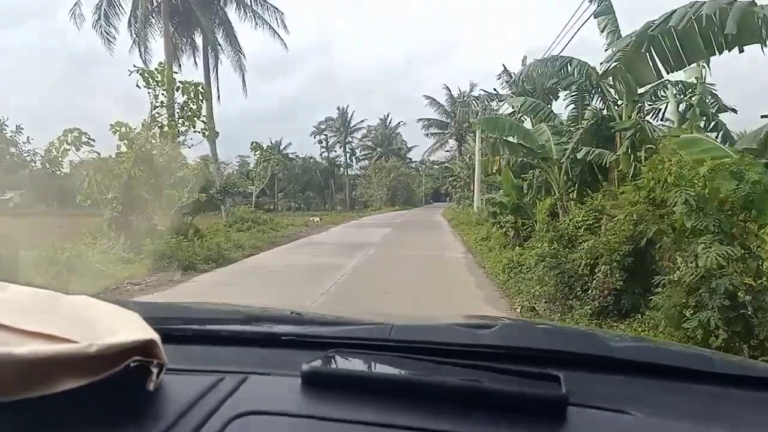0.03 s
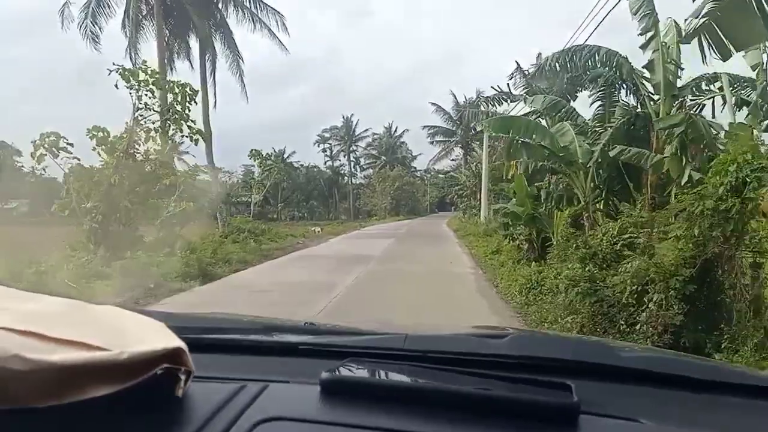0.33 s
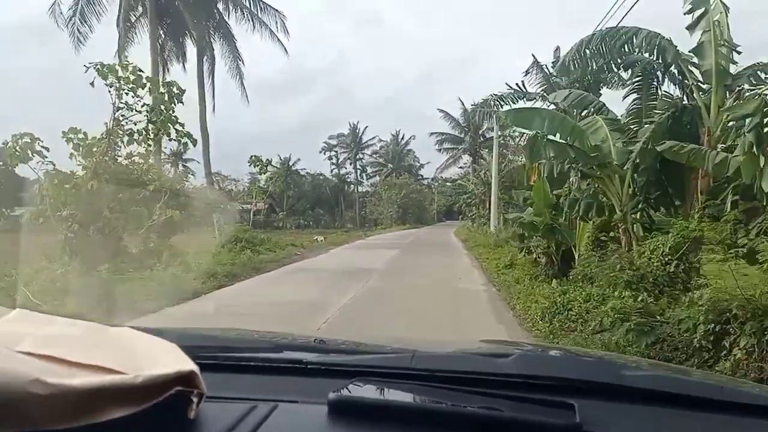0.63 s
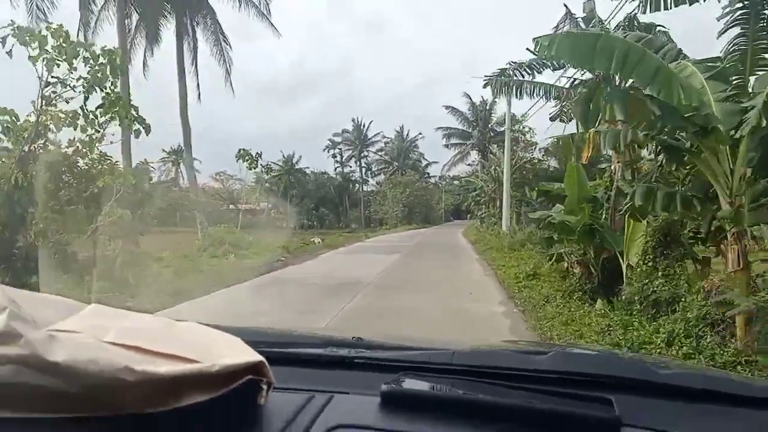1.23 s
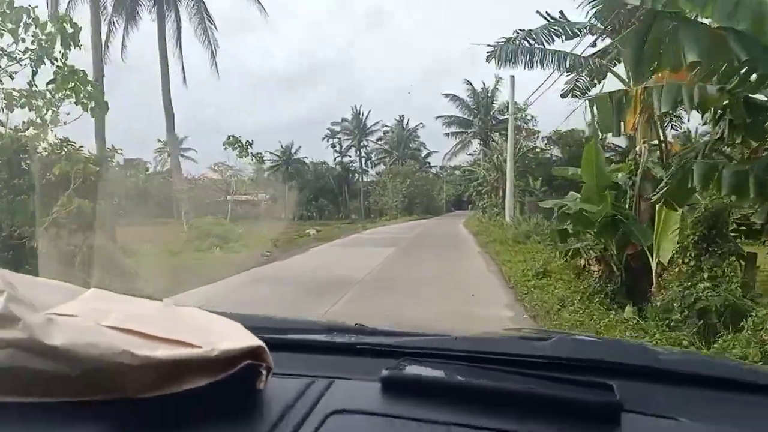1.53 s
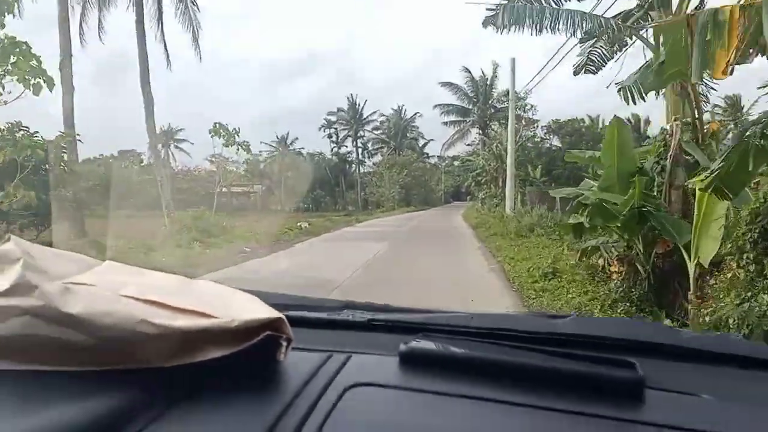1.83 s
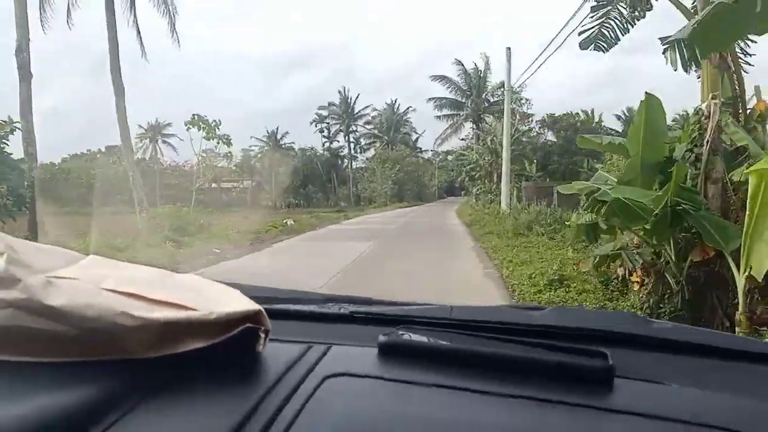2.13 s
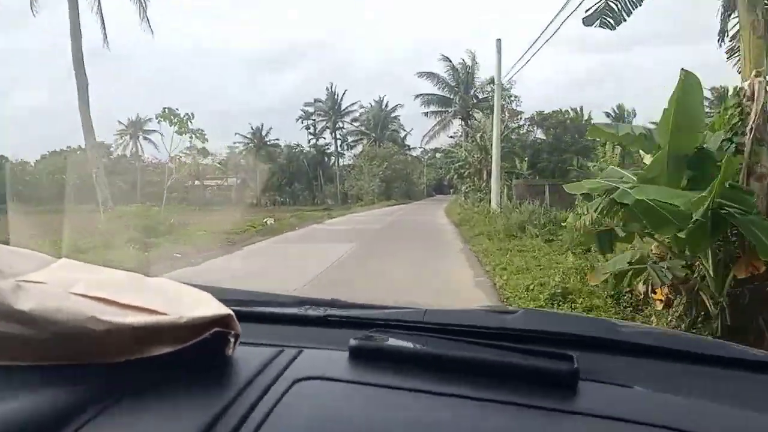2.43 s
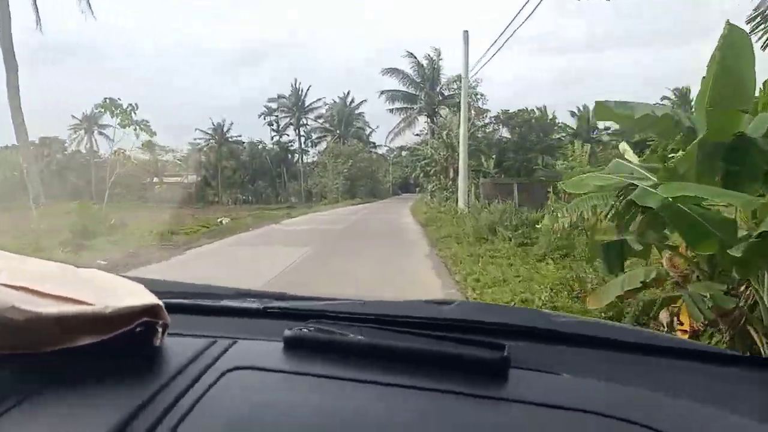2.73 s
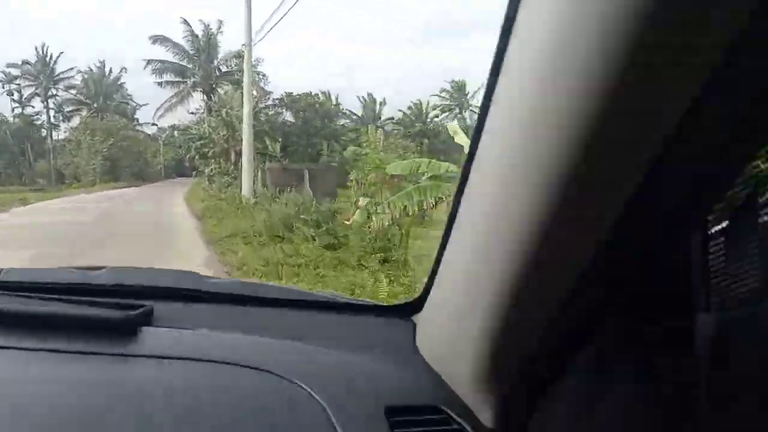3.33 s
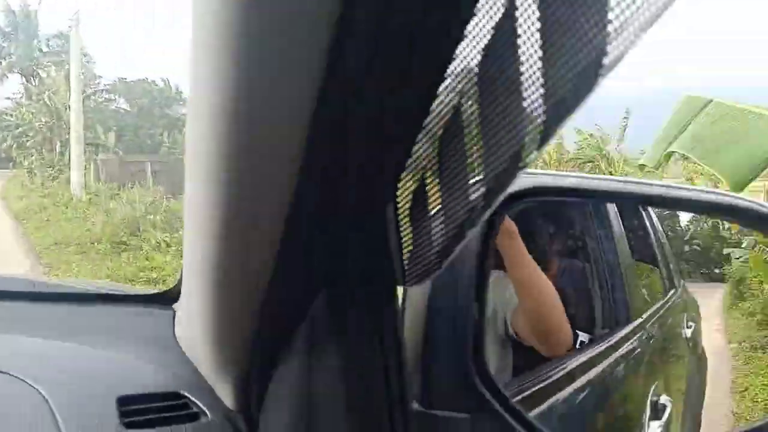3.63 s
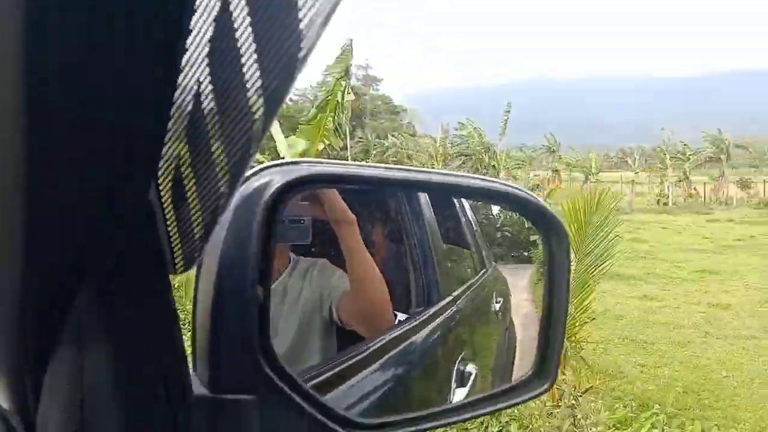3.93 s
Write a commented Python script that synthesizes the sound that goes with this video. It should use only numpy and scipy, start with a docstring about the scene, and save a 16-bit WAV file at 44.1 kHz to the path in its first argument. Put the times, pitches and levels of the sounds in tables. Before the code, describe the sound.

Low engine boom and tyre rumble inside a diesel car moving along a country road.

```python
"""A low engine boom and tyre rumble, heard inside a diesel car gaining a little speed on a country road.
The firings hum in the cabin's resonances, the wheels thump over uneven patches, and air hisses at an
open side window. Diesel clatter grows outside and loose trim rattles. Past halfway a thicket close to
the road slides by and throws the clatter back, and something squeaks faintly, twice."""
import sys
import numpy as np
from scipy import signal
from scipy.fft import rfft, irfft
from scipy.io import wavfile
from scipy.ndimage import uniform_filter1d, map_coordinates

SR = 44100
rng = np.random.default_rng(int(sys.argv[2]) if len(sys.argv) > 2 else 0)


def persist_wave(psi):
    """Save psi, clipped to +-1, as 16-bit WAV."""
    counts = np.round(np.clip(psi, -1, 1) * 32767).astype(np.int16)
    wavfile.write(sys.argv[1], SR, np.atleast_2d(counts).T)


N = 176400
BIN_HZ = np.arange(N // 2 + 1) * SR / N
LEFT_RIGHT = np.array([[1], [-1]])


def undb(db):
    """Decibels to gain."""
    return 10 ** (np.asarray(db) / 20)


def unit(x):
    """Scale to rms 1."""
    return x / np.sqrt(np.mean(x ** 2))


def curve(rows):
    """An automation curve, read at every sample."""
    return np.interp(np.arange(N) / SR, *np.array(rows, float).T)


def per_bin(rows):
    """A curve over frequency, read on a log axis at every spectral bin."""
    f, value = np.array(rows, float).T
    return np.interp(np.log(BIN_HZ + 1), np.log(f), value)


def lift(resonances, hz):
    """Boost in dB that a set of resonances gives at a frequency."""
    return sum(db / (1 + (2 * (hz - f) / width) ** 2) for f, width, db in resonances)


def drift(rate_hz):
    """Smooth random modulation, rms 1."""
    hold = int(SR / rate_hz)
    steps = np.repeat(rng.standard_normal(N // hold + 1), hold)
    return unit(uniform_filter1d(uniform_filter1d(steps, hold), hold)[:N])


# engine speed (t/s, firing rate/Hz)
FIRING_RATE = [(0.0, 37.5), (0.09, 37.4), (1.56, 39.5), (2.0, 42.2), (2.57, 42.5), (2.88, 43.5),
               (3.72, 44.2), (3.92, 43.8), (4.0, 44.4)]
# swell of the hum with engine load (t/s, gain/dB)
ENGINE_LOAD = [(0, -9.5), (.7, -6), (1.3, -3), (1.65, -.5), (2.0, -3), (2.45, 2), (2.8, 1), (3.2, -.5),
               (4, -5)]
# hum partials before load and cabin boost (multiple of the firing rate, level/dB)
HUM_PARTIALS = [(2, -38), (3, -51), (4, -46.5), (5, -43), (6, -43), (7, -48.5), (8, -53), (9, -52),
                (10, -50.5), (11, -54.5), (13, -53.5)]
# cabin air resonances (f/Hz, width/Hz, boost/dB)
CABIN_BOOMS = [(82.4, 8.3, 6.5), (174.8, 10.9, 14), (216.6, 15.4, 12.5), (197, 4.6, 5), (292.4, 4.4, 13),
               (336, 4.6, 13), (484, 5.4, 4.5)]
def engine_hum(firing_hz, firings, jitter_s=.00018, left_lead_s=.00036, waver_db=.45, rough_db=1.5):
    """Harmonics of the slightly uneven firings swell with load and as they climb into cabin resonances."""
    shift_s = jitter_s * drift(44) + left_lead_s * np.array([[1], [0]])
    out = 0
    for k, db in HUM_PARTIALS:
        cycles = k * (firings + firing_hz * shift_s) + rng.random()
        rms = undb(db + lift(CABIN_BOOMS, k * firing_hz) + waver_db * drift(14))
        out = out + rms * np.sqrt(2) * np.sin(2 * np.pi * cycles)
    return out * undb(curve(ENGINE_LOAD) + rough_db * drift(44))


# stereo likeness of noise in the cabin (f/Hz, correlation)
CABIN_LIKENESS = [(100, 1), (210, 1), (320, 0.54), (480, 0.75), (650, -0.065), (950, 0.12), (1500, -0.55),
                  (1850, -0.14), (2250, 0.12), (3000, -0.21), (15000, 0.12)]
def cabin_noise(colour, pan=None):
    """Coloured noise filling the cabin, mono in the bass and wide above; rms 1."""
    mid, side = rfft(rng.standard_normal((2, N))) * undb(per_bin(colour))
    like = per_bin(CABIN_LIKENESS)
    stereo = mid * np.sqrt(1 + like) + LEFT_RIGHT * side * np.sqrt(1 - like)
    pan_db = LEFT_RIGHT * per_bin(pan) / 2 if pan else 0
    return unit(irfft(stereo * undb(pan_db), N))


# tone of tyres and body (f/Hz, relative level/dB)
ROAD_EQ = [(20, -32), (31, -22), (41, 2.5), (55, 3), (75, -2), (100, -4.5), (135, -3), (185, -8), (240, -9),
           (320, -18), (520, -14), (780, -16), (1300, -26), (2200, -21.5), (4000, -42.5), (15000, -69)]
# rumble riding the changing surface (t/s, level/dB)
RUMBLE_LEVEL = [(0, -32.5), (.55, -32), (1.1, -30.5), (1.45, -33.5), (2, -32), (2.8, -33.5), (3.35, -32.5),
                (4, -32)]
# wheels over uneven patches (t/s, peak level/dB)
THUMPS = [(0.351, -31), (1.109, -25.5), (1.561, -41), (1.971, -35), (3.24, -41)]
def road(t, thump_hz=52.3, half_width_s=.03):
    """Tyre rumble through the body, with a soft thump at each uneven patch."""
    out = cabin_noise(ROAD_EQ) * undb(curve(RUMBLE_LEVEL))
    for at, db in THUMPS:
        swell = undb(db) * np.exp(-((t - at) / half_width_s) ** 2)
        out += swell * np.sin(2 * np.pi * thump_hz * (t - at))
    return out


# tone of the hiss (f/Hz, relative level/dB)
AIR_EQ = [(500, 9), (1400, 17.5), (2600, 12.5), (3400, 5), (5000, 2.5), (7000, 3.5), (8400, 4.5),
          (10000, -3), (11500, -4), (12600, -14), (13600, -9), (15500, -20)]
# its place in the stereo field (f/Hz, left minus right/dB)
AIR_PAN = [(500, 1.5), (4200, 0.5), (6500, -3.5), (8500, 4), (10000, 8.5), (12500, -1), (15000, -1)]
# its rise (t/s, level/dB)
AIR_SWELL = [(0, -51), (1.5, -48), (2.2, -40), (3, -39.5), (3.3, -39.5), (3.72, -36.5), (4, -39.5)]
def window_air(flutter_db=1.5):
    """Air and tyre hiss fluttering through the open window."""
    return cabin_noise(AIR_EQ, AIR_PAN) * undb(curve(AIR_SWELL) + flutter_db * drift(14))


# ring of the engine block (f/Hz, width/Hz, boost/dB)
BLOCK_RESONANCES = [(794, 26, 4.5), (1250, 35, 1), (2215, 90, 4.5), (2523, 49, 4), (3800, 180, 2.5)]
def knocks(firing_hz, firings, t, scatter_db=1.3, ring_s=.038, burst_s=.0081, floor=1.4, ring_share=.46):
    """Each firing rings the block in the same way and frees a fresh burst over a floor of noise."""
    count = firings.astype(int)
    strength = undb(scatter_db * rng.standard_normal(count[-1] + 1))[count]
    strikes = np.diff(count, prepend=0) * strength
    ring = rng.standard_normal((2, N)) * np.exp(-t / ring_s)
    rung = signal.fftconvolve(strikes[None], ring, axes=1)[:, :N]
    age = (firings % 1) / firing_hz
    bursts = strength * (floor + np.exp(-age / burst_s)) * rng.standard_normal((2, N))
    blend = np.sqrt(ring_share) * unit(rung) + np.sqrt(1 - ring_share) * unit(bursts)
    return irfft(rfft(blend) * undb(lift(BLOCK_RESONANCES, BIN_HZ)), N)


# stereo likeness of sound from outside (f/Hz, correlation)
OUTSIDE_LIKENESS = [(450, 0.87), (570, .4), (1100, 0.74), (1240, 0.18), (1360, 1), (1470, 0.93),
                    (1580, 0.16), (1950, .35), (2220, 0.99), (2700, 0.27), (6000, 0.046)]
def through_window(pair, colour_db, pan, left_lag_s=.000366):
    """Sound from outside: one path that arrives on the right first, and a scattered rest; rms 1."""
    direct, scattered = rfft(pair) * undb(colour_db)
    like = per_bin(OUTSIDE_LIKENESS)
    left = like * direct + np.sqrt(1 - like ** 2) * scattered
    left *= np.exp(-2j * np.pi * BIN_HZ * left_lag_s)
    return unit(irfft(np.array([left, direct]) * undb(LEFT_RIGHT * per_bin(pan) / 2), N))


# tone of the diesel clatter (f/Hz, relative level/dB)
CLATTER_EQ = [(60, -39), (300, 1), (440, 1.5), (600, -4.5), (800, -3), (1020, 0.5), (1200, -8), (1400, -10),
              (1620, -9), (1800, -2), (1930, -1.5), (2210, 2.5), (2420, -0.5), (2900, -4.5), (3400, -14),
              (4000, -11.5), (4800, -23), (7200, -22.5), (9500, -29), (12500, -36), (15500, -40)]
# its place in the stereo field (f/Hz, left minus right/dB)
CLATTER_PAN = [(1400, 0), (1900, 4), (2250, 3), (2850, -4.5), (7000, -4)]
# its rise and fall (t/s, level/dB)
CLATTER_SWELL = [(0, -80), (.4, -49.5), (.8, -44.5), (1.35, -43.5), (1.7, -34.5), (2.3, -30.5),
                 (2.8, -30.5), (3.25, -40.5), (3.75, -41.5), (4, -42)]
def clatter(firing_hz, firings, t):
    """Diesel knock coming straight in at the window."""
    knock = through_window(knocks(firing_hz, firings, t), per_bin(CLATTER_EQ), CLATTER_PAN)
    return knock * undb(curve(CLATTER_SWELL))


def ringing(modes, age, spread_rad):
    """Damped modes, each a little out of step between left and right."""
    out = 0
    for f, db, t60 in modes:
        phase = 2 * np.pi * f * age + spread_rad * rng.standard_normal((2, 1))
        out = out + undb(db - 60 * age / t60) * np.sin(phase)
    return out


# ring of the trim (f/Hz, relative level/dB, t60/s)
TRIM_MODES = [(1810, -11, 0.032), (1970, -4, 0.029), (2232, -1.5, 0.039), (2410, -13.5, 0.017),
              (2960, -18.5, 0.041)]
# trim hits before panning (t/s, ring gain/dB, scrape level/dB, panel level/dB, panel f/Hz)
TRIM_HITS = [(.963, -30, -45, -40, 540), (.974, -38, -45.5, -43, 555), (1.795, -25, -36, -48, 647),
             (1.798, -22, -34, -32, 668), (1.8015, -34, -34, -34.5, 458), (1.8038, -17.5, -33.5, -25, 459),
             (1.807, -21, -32, -27, 452), (2.7925, -16.5, -42, -32, 570), (2.8025, -22.5, -44, -21, 608),
             (2.815, -17.5, -51, -38, 565)]
def trim_rattles(scrape_hz=(2400, 9700), scrape_decay_s=.0037, panel_t60_s=.1, left_db=3.5):
    """Loose trim scrapes, rings and shakes the panel behind it."""
    out, age = np.zeros((2, N)), np.arange(SR // 5) / SR
    band = signal.butter(2, scrape_hz, "bandpass", fs=SR, output="sos")
    for at, ring_db, scrape_db, panel_db, panel_hz in TRIM_HITS:
        grit = unit(signal.sosfilt(band, rng.standard_normal((2, len(age)))))
        scrape = undb(scrape_db) * grit * np.exp(-age / scrape_decay_s)
        ring = undb(ring_db) * ringing(TRIM_MODES, age, spread_rad=1.0)
        panel = ringing([(panel_hz, panel_db, panel_t60_s)], age, spread_rad=.72)
        start = int(at * SR)
        out[:, start:start + len(age)] += ring + scrape + panel
    return out * undb([[left_db], [0]])


# tone of the thicket's echo (f/Hz, relative level/dB)
ECHO_EQ = [(80, -10), (250, -12), (420, -12), (560, -1), (750, 3), (930, -3.5), (1230, 1.5), (1500, -2.5),
           (1800, 2.5), (2100, 2.5), (2480, 4), (3300, -12.5), (4050, -6), (4800, -12), (7000, -12),
           (9500, -17), (12500, -24), (15500, -26)]
# its place in the stereo field (f/Hz, left minus right/dB)
ECHO_PAN = [(300, -3.5), (2400, 0.5), (4000, 3), (5000, -9), (7000, -10), (8500, 10.5), (9700, 3),
            (12000, 4), (15000, -8)]
# hollow ring in the echo (f/Hz, width/Hz, boost/dB)
ECHO_RESONANCES = [(1245, 70, 3.5), (2000, 53, 8.5), (7150, 360, 5.5)]
# pass-by of each echo band; the lows linger (f/Hz, nearest t/s, approach/s, leave/s)
PASS_BY = [(740, 2.636, 0.26, 0.31), (1250, 2.704, .15, .17), (1530, 2.68, 0.21, 0.24),
           (2170, 2.707, 0.14, 0.1), (3900, 2.787, 0.19, 0.049), (6900, 2.693, 0.21, 0.16)]
def thicket_echo(firing_hz, firings, t, bounce_s=.00394, bounce_gain=.38, gain_db=-22):
    """Clatter thrown back by a thicket on the right, loudest where the leaves are nearest."""
    delayed = [np.arange(N) - bounce_s * SR]  # second path, off the side of the car
    pair = [x + bounce_gain * map_coordinates(x, delayed, mode="mirror")
            for x in knocks(firing_hz, firings, t)]
    colour_db = per_bin(ECHO_EQ) + lift(ECHO_RESONANCES, BIN_HZ)
    echo = rfft(through_window(pair, colour_db, ECHO_PAN))
    out = 0
    for centre, nearest, approach, leave in PASS_BY:
        band = per_bin([(f, f == centre) for f, *_ in PASS_BY])  # crossfades into its neighbours
        along = (t - nearest) / np.where(t < nearest, approach, leave)
        out = out + irfft(echo * band, N) / (1 + along ** 2)
    return out * undb(gain_db)


# faint squeaks (t/s, f/Hz, half-width/s, peak level/dB)
SQUEAK_CUES = [(2.535, 6650, 0.031, -46), (3, 4300, 0.034, -44)]
def squeaks(t, wobble_hz=35):
    """Thin tones of unsteady pitch that swell and fade."""
    wobble = wobble_hz * np.cumsum(drift(200)) / SR
    out = 0
    for at, f, half_width, db in SQUEAK_CUES:
        swell = undb(db) * np.exp(-((t - at) / half_width) ** 2)
        out = out + swell * np.sin(2 * np.pi * (f * t + wobble))
    return out


def scene():
    """Engine, road, air and trim as heard from the front seat."""
    t, firing_hz = np.arange(N) / SR, curve(FIRING_RATE)
    firings = np.cumsum(firing_hz) / SR  # running count: locks hum, clatter and echo together
    engine = engine_hum(firing_hz, firings) + clatter(firing_hz, firings, t)
    echo = thicket_echo(firing_hz, firings, t)
    return engine + echo + road(t) + window_air() + trim_rattles() + squeaks(t)


def record(dry, balance_db=.5, top_hz=15600):
    """The phone favours the left a little and cuts the top."""
    high_cut = signal.ellip(10, .2, 80, top_hz, fs=SR, output="sos")
    return signal.sosfilt(high_cut, dry * undb(LEFT_RIGHT * balance_db))


dry = scene()
out = record(dry)
persist_wave(out)
```